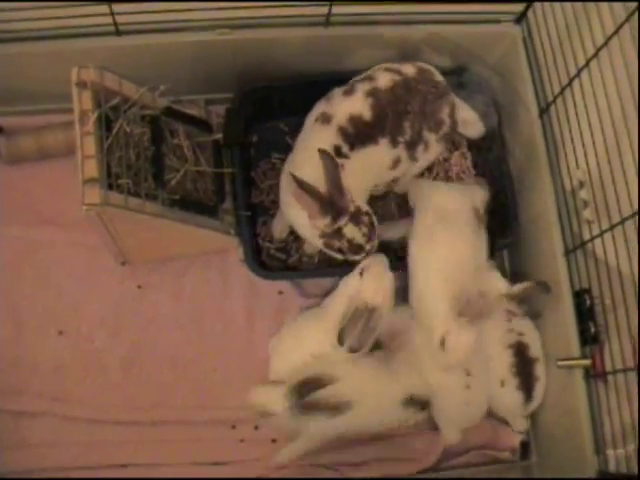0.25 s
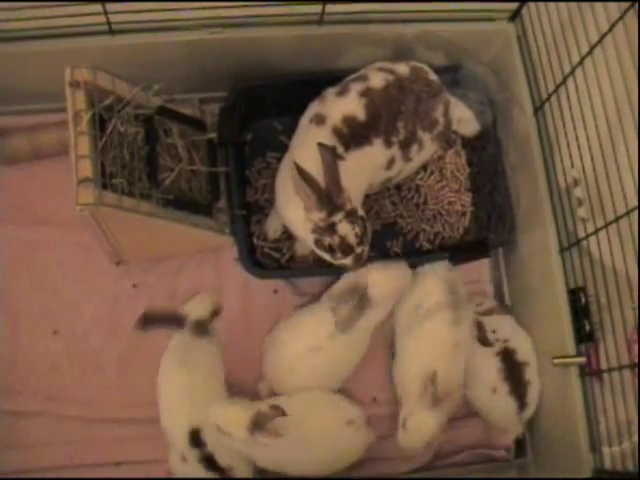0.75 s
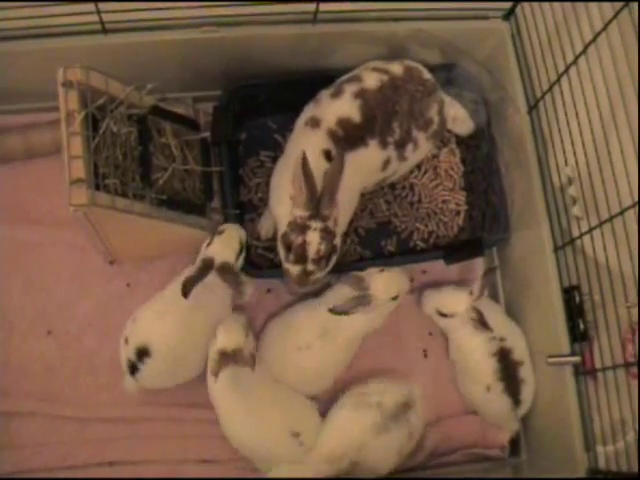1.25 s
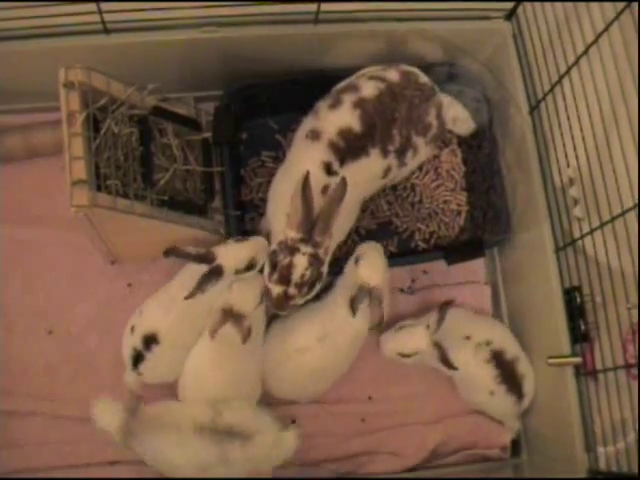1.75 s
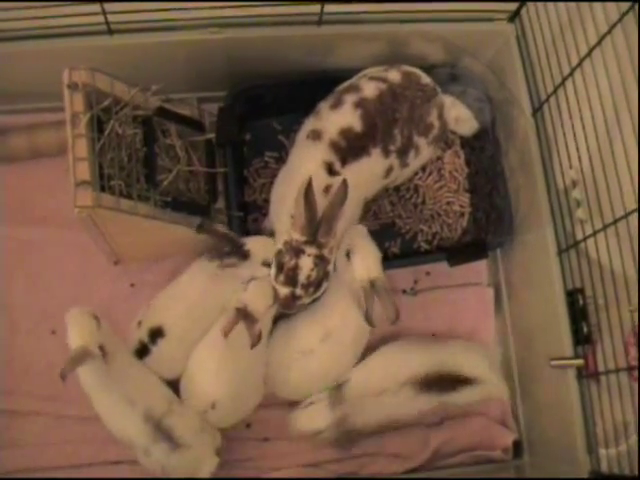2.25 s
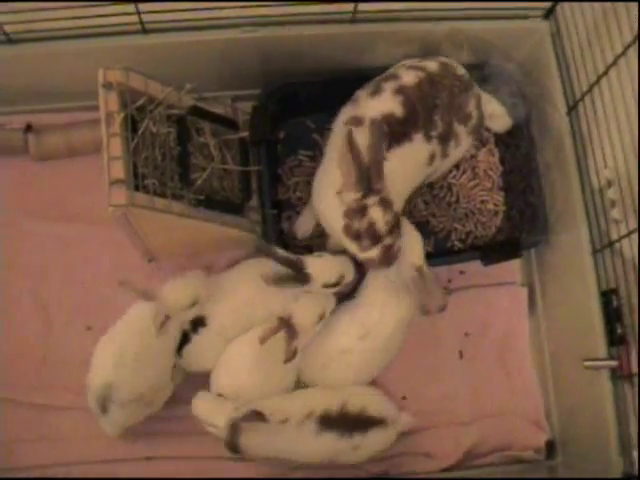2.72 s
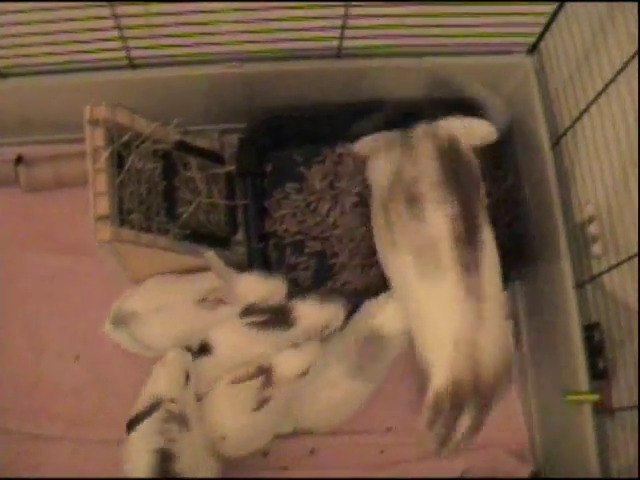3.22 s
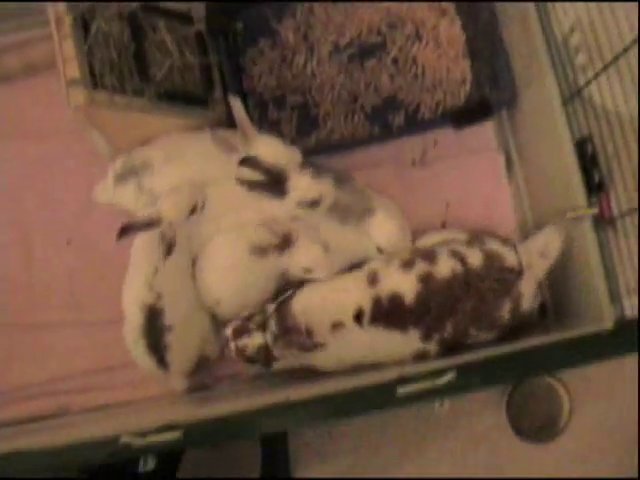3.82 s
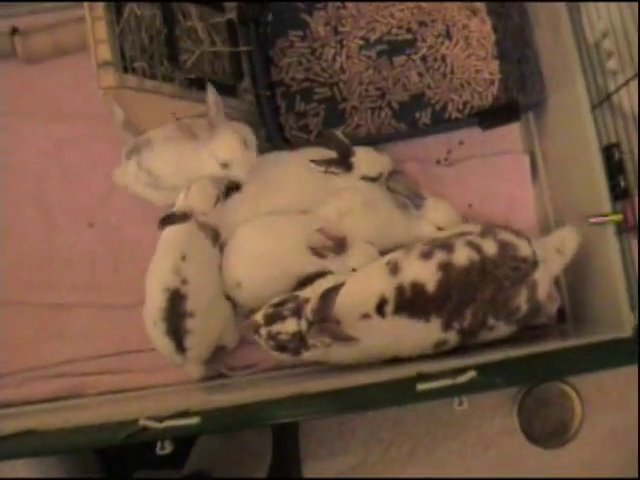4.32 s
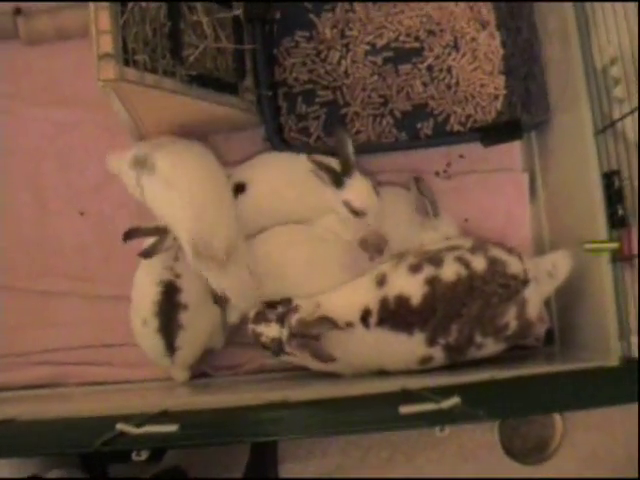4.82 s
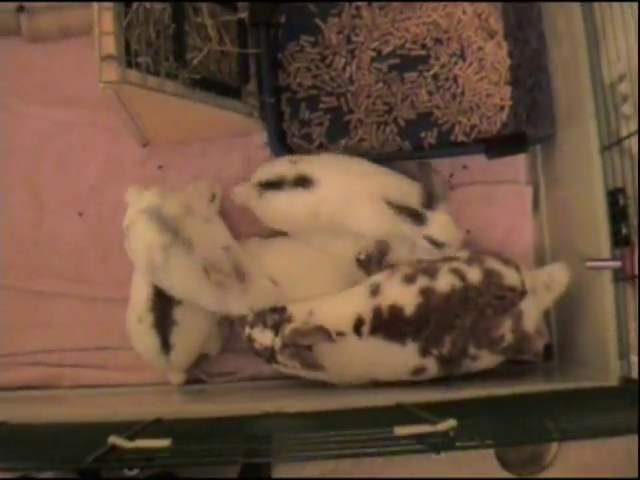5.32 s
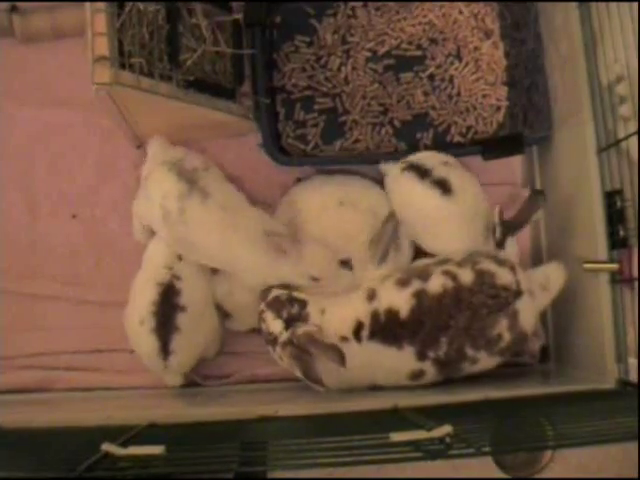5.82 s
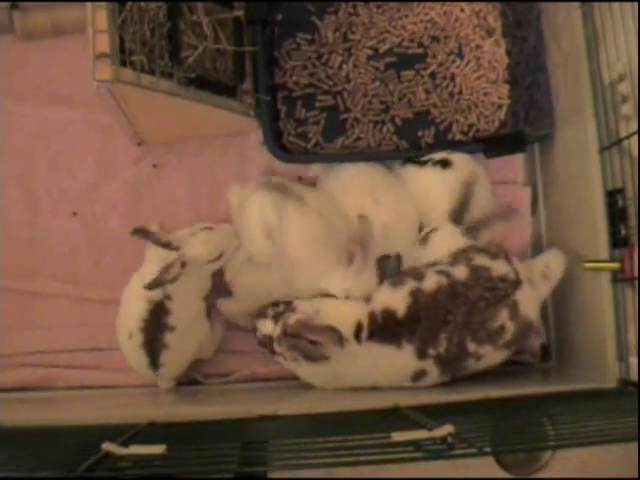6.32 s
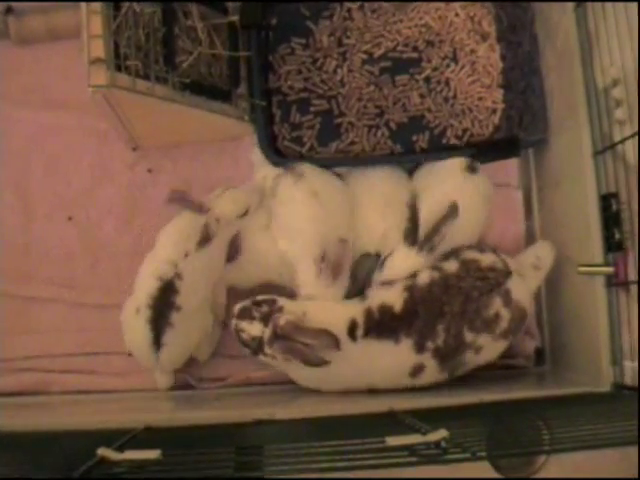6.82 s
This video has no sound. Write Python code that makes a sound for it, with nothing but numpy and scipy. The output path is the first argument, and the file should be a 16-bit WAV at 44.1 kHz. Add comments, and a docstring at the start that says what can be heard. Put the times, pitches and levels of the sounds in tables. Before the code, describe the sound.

A steady thin camcorder buzz, low hum and soft hiss lie under everything, in a small room with a short reverberation. From 0.15 to 0.45 s rabbit claws scrabble through cloth and pellets with quick dry snaps; hollow plastic thuds and low floor rumbling follow to about 0.85 s. A brief scrape and knock come near 0.92 s, then only soft, scattered bumps, with a light click at 1.26 s. From 2.7 s movement grows, with a knock at 3.06 s, building to a dense clatter from 3.3 to 3.6 s, peaking in a loud sharp crack at 3.55 s. Then it is nearly quiet. Faint even focus-motor ticks run about 4.6 to 6.1 s, while small dull paw thuds patter from 5.0 to 6.5 s. At 6.8 s a sharp knock and strong hollow thump land, with another thump at 6.9 s, fading into buzz.

```python
"""Rabbits in a cage

Young rabbits and their mother scuffle close in front of a tape camcorder's microphone, in a small room that answers.
Paws ring the damped modes of a blanket-lined plastic floor pan, and shifting bodies push on the same modes.
Claws and wood pellets snap as short knocks with noise, and scrabble as dense clacks over the rub of cloth.
The camcorder adds its head drum's buzz (a row of harmonics), its focus motor's ticks, hum and hiss."""
import sys
import numpy as np
from scipy import signal
from scipy.fft import rfft, irfft, next_fast_len
from scipy.io import wavfile
from scipy.ndimage import map_coordinates

SR = 44100
rng = np.random.default_rng(int(sys.argv[2]) if len(sys.argv) > 2 else 0)


def dump(signal):
    """Clip the signal to [-1, 1] and save it as 16-bit WAV at the path in sys.argv[1]."""
    limited = np.clip(np.atleast_2d(signal).T, -1, 1)
    pcm = np.round(limited * 32767).astype(np.int16)
    wavfile.write(sys.argv[1], SR, pcm)


N = 311346  # samples


def amp(db):
    """Gain of a level in dB."""
    return 10 ** (np.asarray(db) / 20)


def unit(x):
    """x at rms 1."""
    return x / np.sqrt(np.mean(x ** 2) + 1e-20)


def along(points, hz):
    """Value at hz between (frequency, value) points on a log frequency axis."""
    point_hz, values = np.transpose(points)
    return np.interp(np.log(hz + 1), np.log(point_hz + 1), values)


def curves(rows):
    """One value per sample for each column after the time."""
    times, *columns = np.transpose(rows)
    return [np.interp(np.arange(N) / SR, times, column) for column in columns]


def wobble(rate):
    """A smooth random curve, rate knots a second."""
    knots = rng.standard_normal(int(N * rate / SR) + 4)
    return map_coordinates(knots, [np.arange(N) * rate / SR])


def filtered(x, response):
    """x with its spectrum multiplied by a response of frequency."""
    m = next_fast_len(N + SR // 2)
    hz = np.fft.rfftfreq(m, 1 / SR)
    return irfft(rfft(x, m) * response(hz), m)[..., :N]


def noise(spectrum):
    """Coloured noise of rms 1."""
    return unit(filtered(rng.standard_normal(N), lambda hz: amp(along(spectrum, hz))))


def ring(hz, t60, attack, length=.3):
    """A damped vibration: t60 [s] to fall 60 dB, attack time constant [s]."""
    t = np.arange(int(length * SR)) / SR
    return np.sin(2 * np.pi * hz * t) * amp(-60 * t / t60) * (1 - np.exp(-t / attack))


def add(track, s, db, sound):
    """Lay a sound into a track at a time [s] and peak level [dB]."""
    spot = track[round(s * SR):][:len(sound)]
    spot += amp(db) * sound[:len(spot)] / np.abs(sound).max()


DRUM_HZ = 299.7  # tick rate of the head drum
# Drum buzz at the microphone, one row per multiple of the tick rate: (rms level before it wavers [dB])
DRUM_HARMONICS = [-82, -83, -92, -90, -80, -84, -95, -97, -80, -92, -89, -88, -99, -85, -85, -87, -79, -75,
                  -79, -78, -81, -83, -92, -82, -75, -77, -75, -77, -81, -81, -84, -90, -85, -83, -83, -87,
                  -83, -86, -81, -82, -86, -91]


def drum():
    """The heads strike the tape steadily: all multiples start together, as from one tick, and waver a little."""
    log_gain = np.log(amp(np.pad(DRUM_HARMONICS, (1, 22), "edge")))
    cepstrum = irfft(log_gain)
    cepstrum[len(cepstrum) // 2:] = 0
    phase = 2 * rfft(cepstrum).imag  # the phase of a causal tick with this spectrum
    turn = 2 * np.pi * DRUM_HZ * np.arange(N) / SR + 0.044 * wobble(2.98)
    knots = np.linspace(0, N, 60)
    out = np.zeros(N)
    for k, db in enumerate(DRUM_HARMONICS, 1):
        waver = np.interp(np.arange(N), knots, amp(1.77 * rng.standard_normal(len(knots))))
        out += np.sqrt(2) * amp(db) * waver * np.cos(k * turn + phase[k])
    return out


# Mains and the drum's turn: (frequency [Hz], rms level [dB])
HUM_TONES = [(60, -72.5), (DRUM_HZ / 2, -73.5)]


def hum():
    """Steady sines at the mains frequency and the drum's rate of turning."""
    t = np.arange(N) / SR
    return sum(np.sqrt(2) * amp(db) * np.sin(2 * np.pi * hz * t) for hz, db in HUM_TONES)


# Colour of the hiss common to both channels: (frequency [Hz], relative level per Hz [dB])
HISS_MID = [(20, 3.5), (70, -0.5), (150, 5.5), (400, -6), (700, -10), (1500, -11), (5000, -13), (8000, -16),
            (12600, -19)]
# Colour of a faint noise opposed between the channels: (frequency [Hz], relative level per Hz [dB])
HISS_SIDEWAYS = [(30, -11), (250, 4), (600, 10), (1500, 0), (3900, -6.5), (4300, -36), (12600, -29)]


def hiss():
    """Coloured random hiss ahead, and a separate faint noise opposed between the channels."""
    return amp(-61) * noise(HISS_MID), amp(-65.5) * noise(HISS_SIDEWAYS)


# Bodies shifting their weight on the pan: (time [s], level before it wobbles [dB])
SHUFFLE_LEVEL = [(0, -78), (.2, -59.5), (.33, -47.5), (.5, -48), (.62, -44), (.76, -60), (.95, -66.5),
                 (1.5, -75.5), (3.0, -67.5), (3.4, -54), (3.75, -102), (5.0, -77), (5.7, -70.5),
                 (6.78, -74), (6.85, -45.5), (7.06, -63.5)]
# Modes of the cage floor pan, for shuffles and paws alike: (frequency [Hz], relative level [dB], t60 [s])
PAN_MODES = [(128, -16.5, 0.5), (164.5, -3, 0.1), (212.7, -4, 0.076), (348.5, 4.5, 0.066),
             (392.4, -9, 0.11), (466.7, -4.5, 0.098)]


def grains(rate, spread_db):
    """Random tiny impacts of very unequal size, rate a second, rms 1."""
    hits = rng.random(N) < rate / SR
    return unit(hits * rng.standard_normal(N) * amp(spread_db * rng.exponential(size=N)))


def shuffle():
    """Soft irregular pushes keep the pan's modes murmuring, the higher ones driven less."""
    level_db, = curves(SHUFFLE_LEVEL)
    pushes = 1.06 * rng.standard_normal(N) + grains(150, 0.92)
    lowest_hz = PAN_MODES[0][0]
    pan = sum(amp(db - 4 * np.log2(hz / lowest_hz)) * ring(hz, t60, 0.003) for hz, db, t60 in PAN_MODES)
    murmur = unit(signal.fftconvolve(pushes, pan)[:N])
    return amp(level_db + 1.1 * wobble(7.4)) * murmur


# How long the small room answers: (frequency [Hz], t60 [s])
ROOM_DECAY = [(120, 0.27), (500, 0.37), (2000, 0.31), (10000, 0.13)]
# Sideways part of the room's answer: (frequency [Hz], gain [dB])
ROOM_WIDTH = [(100, -62), (600, -11), (2000, -51)]


def room(x):
    """Decaying noise answers the cage, ahead and sideways, drawn anew three times a second."""
    out = np.zeros((2, N + 2 * SR))
    hop, delay = SR // 3, 300  # samples
    for start in range(0, N, hop):
        hz, t, z = signal.stft(rng.standard_normal((2, SR // 2)), SR, nperseg=256)
        decay = amp(-60 * t / along(ROOM_DECAY, hz)[:, None])
        tail = signal.istft(z * decay, SR, nperseg=256)[1]
        tail /= np.linalg.norm(tail[0])
        answer = signal.fftconvolve(x[None, start:start + hop], tail, axes=1)
        out[:, start + delay:start + delay + answer.shape[1]] += answer
    return out[0, :N], filtered(out[1, :N], lambda hz: amp(along(ROOM_WIDTH, hz)))


# Paws landing on the pan: (time [s], peak level [dB], pitch of the thud [Hz], hardness [dB])
PAW_FALLS = [(0.012, -41.5, 306, -14), (0.449, -22, 392, 6.5), (0.538, -21, 216, 4.5),
             (0.796, -22, 298, -14), (0.836, -36, 220, -14), (1.143, -39.5, 114, -21),
             (1.268, -42, 155, -3), (1.336, -40, 192, -12), (1.632, -47, 310, -12), (1.733, -34, 132, -37),
             (2.553, -43, 340, -3), (2.681, -34.5, 170, -7.5), (3.052, -31.5, 372, 10.5),
             (3.242, -38.5, 240, -19), (3.343, -35, 404, -20), (3.54, -32.5, 425, 2),
             (3.649, -39.5, 155, -9), (4.511, -49.5, 300, 14), (4.731, -52.5, 300, 15),
             (5.019, -50, 296, -12), (5.171, -39, 120, -12), (5.208, -41, 124, -33), (5.579, -42, 330, 4),
             (5.627, -36.5, 315, -0.5), (5.662, -39, 334, -16), (5.836, -32.5, 240, -12),
             (5.885, -40.5, 314, -7), (6.056, -50, 318, -1), (6.09, -50, 199, 7), (6.208, -40, 172, -4),
             (6.297, -44.5, 484, 5), (6.39, -35.5, 323, -8), (6.491, -49, 342, 17),
             (6.791, -21.5, 354, 2.5), (6.889, -24.5, 266, -7)]
# The pan's stiff rim, rung by hard blows: (frequency [Hz], relative level [dB], t60 [s])
RIM_MODES = [(601.3, -1, 0.049), (679, 3.5, 0.023), (863, -11, 0.088), (1013, -8.5, 0.05)]


def paws():
    """A paw drives most the pan modes nearest its thud in pitch; a harder one rings the rim more."""
    out = np.zeros(N)
    chance = rng.standard_normal((len(PAW_FALLS), len(PAN_MODES) + len(RIM_MODES)))
    for (s, db, thud_hz, hard_db), luck in zip(PAW_FALLS, chance):
        blow = 3.5 * ring(thud_hz, 0.031, 0.3 / thud_hz)  # the pan gives under the paw
        for (hz, mode_db, t60), u in zip(PAN_MODES, luck):
            octaves_away = abs(np.log2(hz / thud_hz))
            blow += amp(mode_db + 3 * u - 6 * octaves_away) * ring(hz, t60, .004)
        for (hz, mode_db, t60), u in zip(RIM_MODES, luck[len(PAN_MODES):]):
            blow += amp(hard_db) * amp(mode_db + 3 * u) * ring(hz, t60, .0015)
        add(out, s + 0.002846, db, blow)  # each thud starts about 3 ms after its listed time
    # a small pan sends out no deep bass
    return signal.lfilter(*signal.butter(2, 105, "high", fs=SR), out)


# Claws and pellets snapping on plastic: (time [s], peak level [dB], pitch [Hz], crack level [dB])
SNAP_HITS = [(0.046, -35, 2670, -43), (0.266, -39.5, 3600, -8), (0.3084, -23, 2130, -18),
             (0.3336, -23, 1420, -8), (0.3548, -25.5, 1390, -24), (0.394, -34, 3500, -24),
             (0.4234, -22, 3120, -8.5), (0.9273, -29, 2280, -14), (1.067, -44.5, 2130, -32),
             (1.263, -36, 1200, 16), (2.7532, -43.5, 1790, -24), (2.9139, -46, 1510, -25),
             (3.0555, -20.5, 1480, -54), (3.0969, -32, 2300, -28), (3.146, -32, 1440, -30),
             (3.2817, -38.5, 2800, -27), (3.3412, -34, 2230, -25), (3.3845, -32, 1620, -37),
             (3.4114, -28, 1300, -28), (3.434, -23, 3740, -11), (3.4553, -21.5, 1670, -13),
             (3.466, -34, 1390, -40), (3.4873, -17.5, 990, -30), (3.5353, -23.5, 850, -37),
             (3.5466, -10, 2080, -5.5), (3.5617, -17.5, 1646, -45), (3.591, -27, 1170, -17),
             (6.8009, -15.5, 1640, -21)]


def snaps():
    """Each snap is a knock of a few cycles, a band of rattling noise around it, and a crack on top."""
    out = np.zeros(N)
    t = np.arange(SR // 10) / SR
    chance = rng.standard_normal((len(SNAP_HITS), 2, len(t)))
    bright = signal.butter(2, 4200, "high", fs=SR)
    for (s, db, hz, crack_db), (dull, sharp) in zip(SNAP_HITS, chance):
        knock = ring(hz, 9 / hz, .1 / hz, length=.1)[:len(t)]
        rattle = 0.69 * dull * amp(-60 * t / 0.017)
        body = signal.butter(3, [hz / 2, 4500], "band", fs=SR)
        crack = signal.lfilter(*bright, sharp * amp(crack_db - 60 * t / .007))
        add(out, s, db, signal.lfilter(*body, knock + rattle) + crack)
    return out


def pellets(count=15000, size=160):
    """Thousands of tiny wooden clacks, each a few cycles at its own pitch and size; rms 1."""
    start = rng.random(count)
    pitch, cycles = rng.standard_normal((2, count))
    weight = rng.exponential(size=count)
    hz = np.clip(2200 * np.exp(.5 * pitch), 700, 11000)[:, None]
    turns = hz * np.arange(size) / SR
    clack = np.sin(2 * np.pi * turns) * np.exp(-turns / (1.8 * np.exp(.3 * cycles[:, None])))
    clack *= amp(3.8 * np.minimum(weight, 3)[:, None] - 2 * np.log2(hz / 2000))
    spot = (start * N).astype(int)[:, None] + np.arange(size)
    return unit(np.bincount(spot.ravel(), clack.ravel(), N + size)[:N])


ATTACK_S, SAG_DB_PER_S, RELEASE_DB_PER_S = 0.0073, -2, 311  # a negative sag swells


def stroke(start, length):
    """Level in dB of one stroke: it bites, swells very slightly while it lasts, then dies away."""
    t = np.arange(N) / SR - start
    bite = np.clip(t / ATTACK_S, 1e-6, 1)
    sag_db = SAG_DB_PER_S * np.clip(t, 0, length)
    release_db = RELEASE_DB_PER_S * np.maximum(t - length, 0)
    return 20 * np.log10(bite) - sag_db - release_db


# Rub of fur and blanket: (frequency [Hz], relative level per Hz [dB])
CLOTH_RUB = [(300, -9), (800, -1.5), (2000, -2.5), (3600, -8), (5000, -16), (12000, -26)]
# Strokes of feet through pellets and cloth; bare claws are brighter, weight adds body:
# (start [s], length [s], level [dB], treble gain [dB], bass gain [dB])
FOOT_STROKES = [(0.159, 0.03, -54, -5, -7), (0.194, 0.14, -46.5, -2, -6), (0.295, 0.042, -38, 0.5, -5),
                (0.355, 0.095, -49, 2, 0), (0.534, 0.016, -51.5, -18, 8), (0.595, 0.24, -66, -18, 3),
                (0.914, 0.022, -50.5, -8, -2), (1.261, 0.015, -56.5, -6, 4),
                (2.776, 0.071, -65.5, -19, 2.5), (2.897, 0.067, -65, -15, 2),
                (2.999, 0.022, -52, -1.5, -7.5), (3.049, 0.022, -44.5, -7, 2), (3.088, .015, -48, -13, 3),
                (3.131, 0.0098, -52.5, -18, 4), (3.237, 0.039, -57.5, -4, 4.5),
                (3.331, 0.015, -44.5, -17, -3), (3.384, 0.073, -40, -3.5, -2.5), (3.487, 0.017, -52, 1, -3),
                (3.535, 0.069, -47, 11, -4), (5.657, 0.014, -60, -13, 0), (6.793, 0.007, -34.5, 3, -17)]


def scrabble():
    """Pellets and claws clack densely over the rub of cloth."""
    rub = 0.7 * pellets() + 0.73 * noise(CLOTH_RUB)
    treble = filtered(rub, lambda hz: 1 / (1 + (4000 / (hz + 1)) ** 6))
    bass = filtered(rub, lambda hz: 1 / (1 + (hz / 1150) ** 6))
    middle = rub - treble - bass
    out = np.zeros(N)
    for s, length, db, treble_db, bass_db in FOOT_STROKES:
        coloured = middle + amp(treble_db) * treble + amp(bass_db) * bass
        out += amp(db + stroke(s, length)) * coloured
    return amp(2.76 * wobble(70)) * out


STEP_S = .0669  # pace of the focus motor
# The motor clicks on and off: (time [s], peak level [dB])
FOCUS_CLICKS = [(4.611, -56), (6.113, -50.5)]
# Runs of even motor steps: (first step [s], end of run [s])
FOCUS_RUNS = [(4.7125, 4.92), (5.0123, 6.02)]


def focus():
    """The lens motor clicks on, steps with a high tick in runs, and clicks off; a lower tick keeps the pace."""
    out = np.zeros(N)
    tick = lambda hz, t60: ring(hz, t60, 0.0022, length=.05)
    lead = .002  # s, lets the tick swell in before its listed time
    for s, db in FOCUS_CLICKS:
        add(out, s - lead, db, tick(3320, 0.011))
    for first, last in FOCUS_RUNS:
        for s in np.arange(first, last, STEP_S):
            add(out, s - lead, -62 + rng.normal(0, 0.97), tick(3430, 0.026))
    for s in np.arange(4.678, 6.0, STEP_S):
        add(out, s, -64 + rng.normal(0, 1.2), tick(1940, .02))
    return out


def scene():
    """The cage in front, its pan barely to the left, and the camcorder's own noises."""
    buzz = drum()
    hiss_mid, hiss_side = hiss()
    thumps = shuffle() + paws()
    cage = thumps + snaps() + scrabble()
    ahead, sideways = room(cage)
    mid = cage + amp(-9.5) * ahead + buzz + hum() + focus() + hiss_mid
    # the side channel holds the buzz only in a narrow band near 8 kHz
    buzz_side = filtered(buzz, lambda hz: amp(along([(7000, -75), (8000, 0.5), (9000, -49)], hz)))
    side = 0.012 * thumps + sideways + hiss_side + buzz_side
    return np.array([mid + side, mid - side])


TOP_HZ = 12650  # the camcorder's band limit


def record(dry):
    """The camcorder keeps nothing above its band limit."""
    return filtered(dry, lambda hz: hz < TOP_HZ)


dry = scene()
out = record(dry)
dump(out)
```